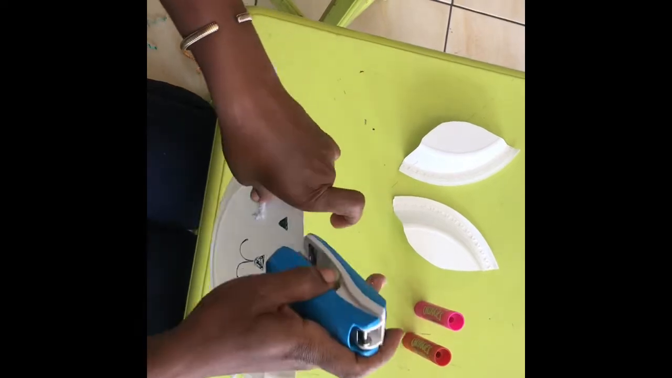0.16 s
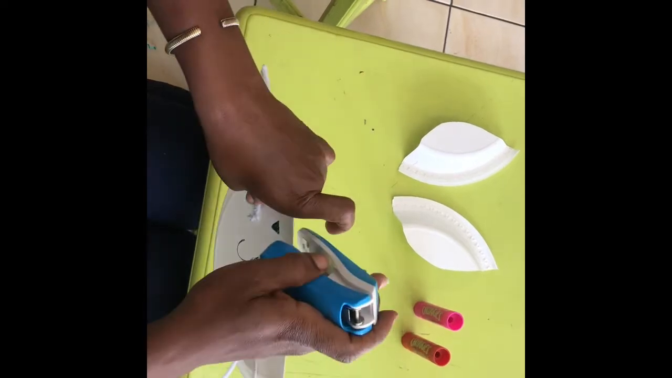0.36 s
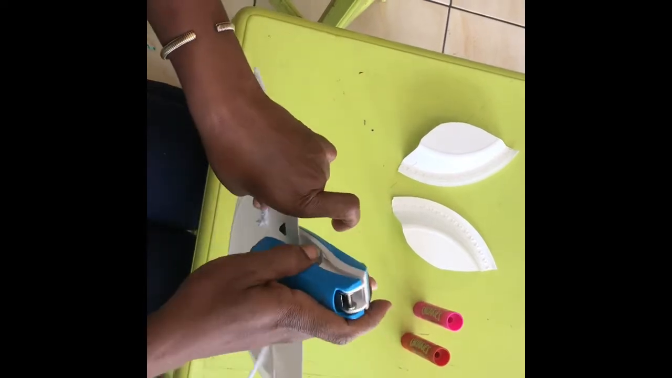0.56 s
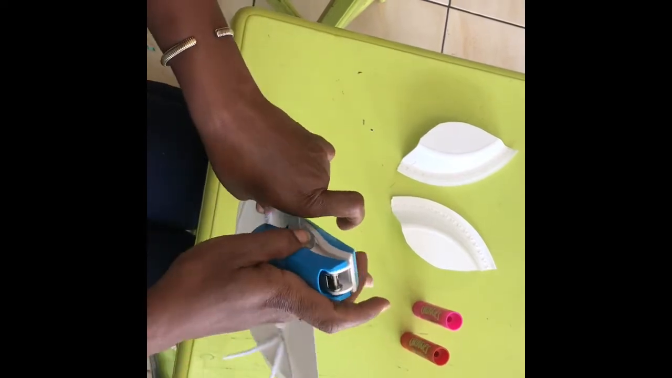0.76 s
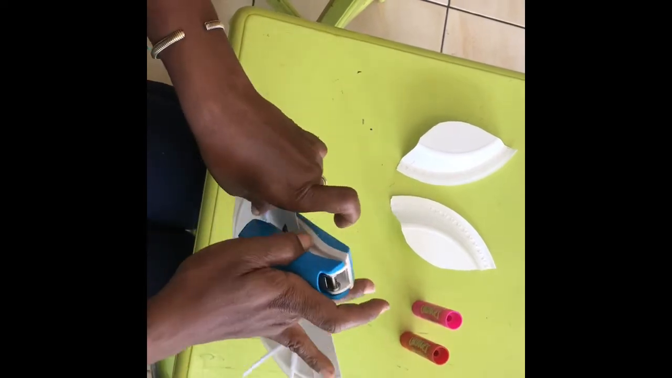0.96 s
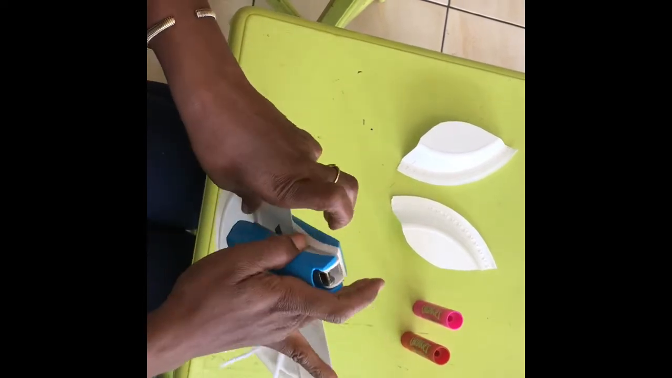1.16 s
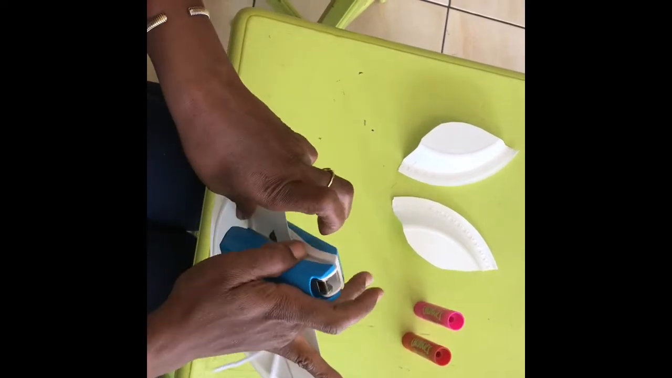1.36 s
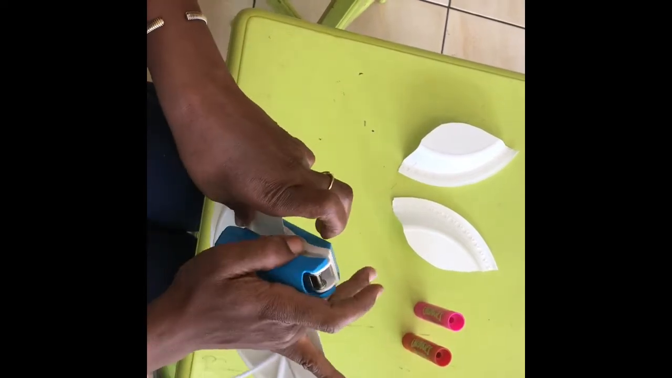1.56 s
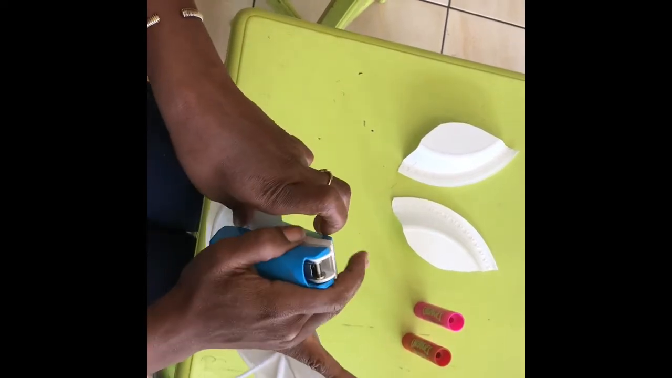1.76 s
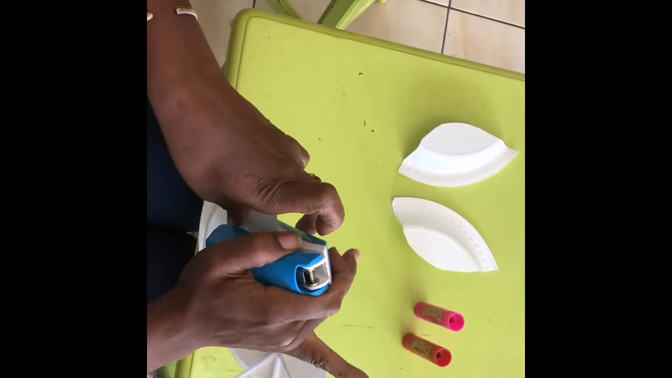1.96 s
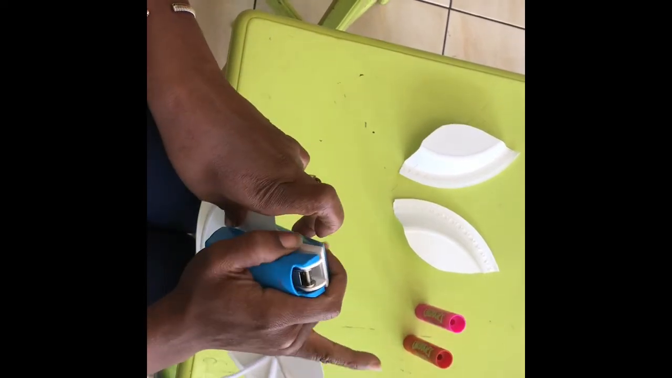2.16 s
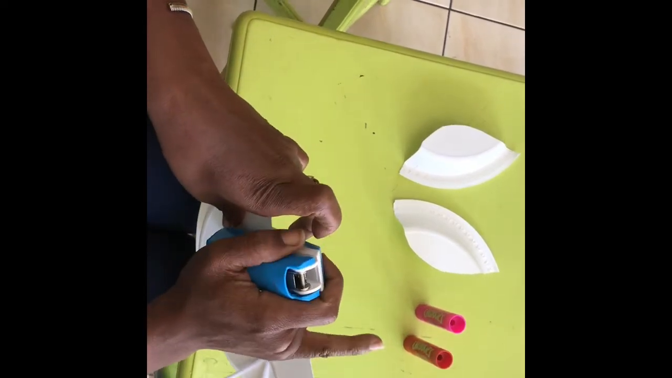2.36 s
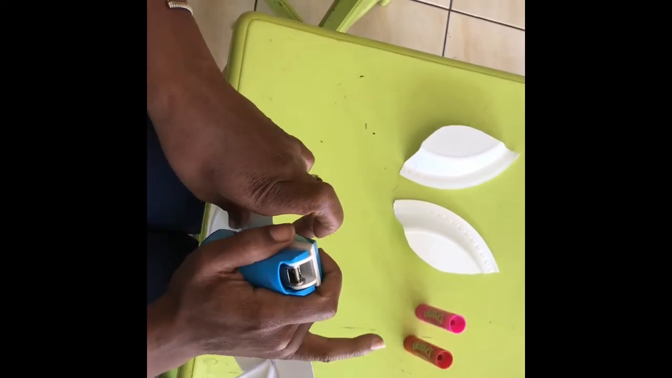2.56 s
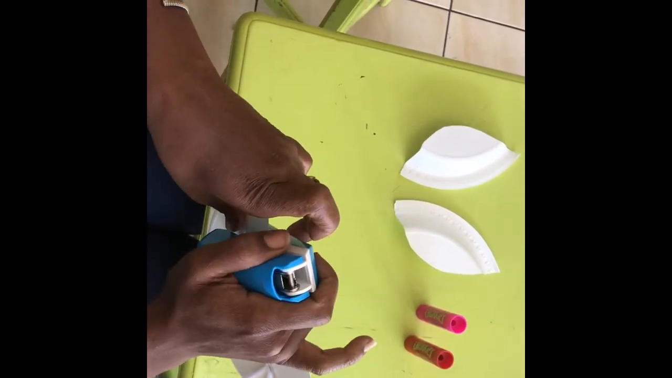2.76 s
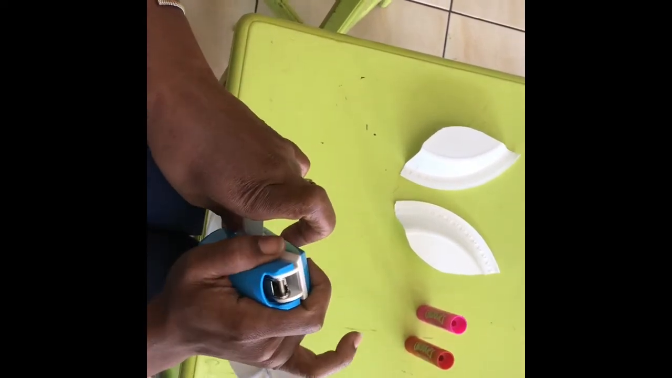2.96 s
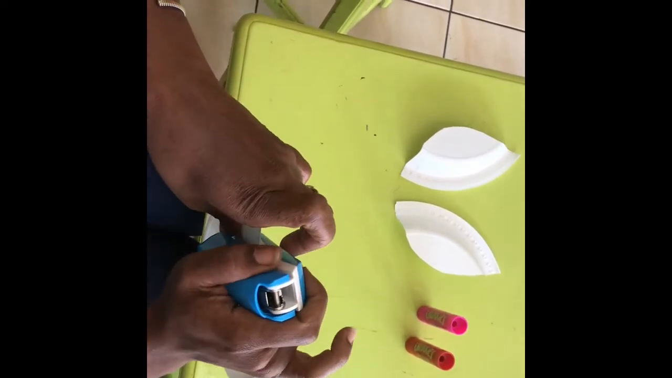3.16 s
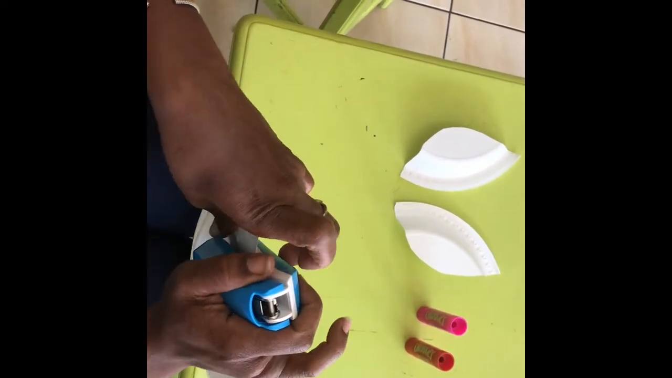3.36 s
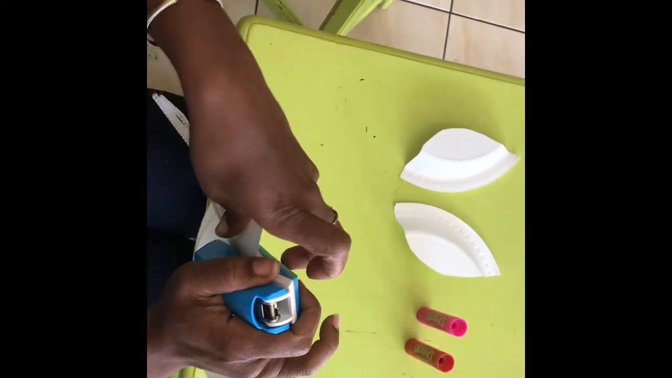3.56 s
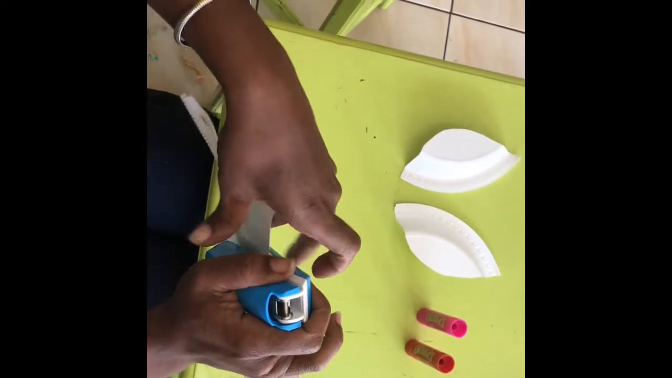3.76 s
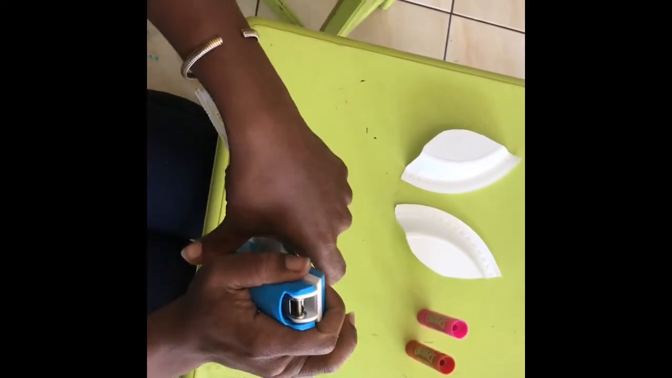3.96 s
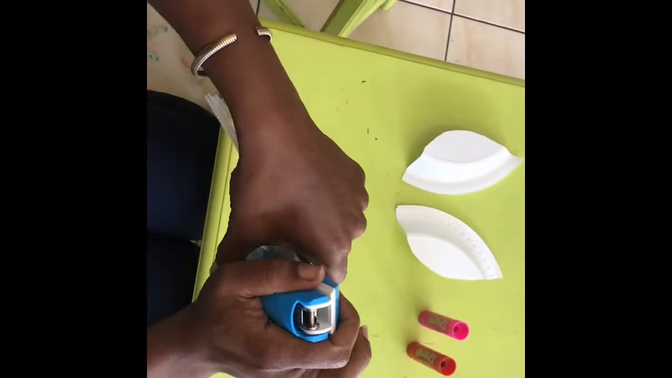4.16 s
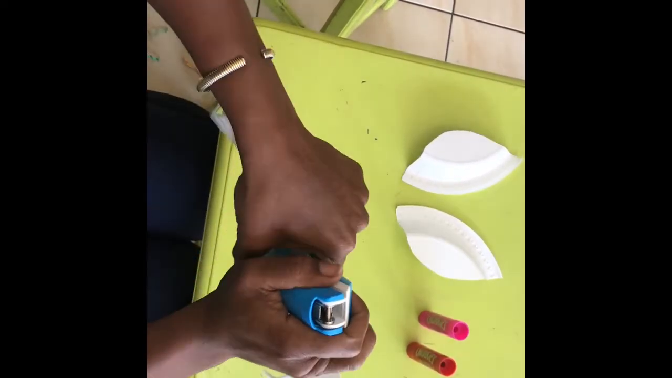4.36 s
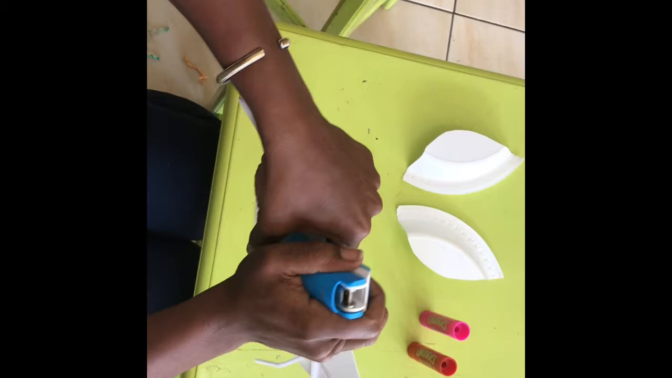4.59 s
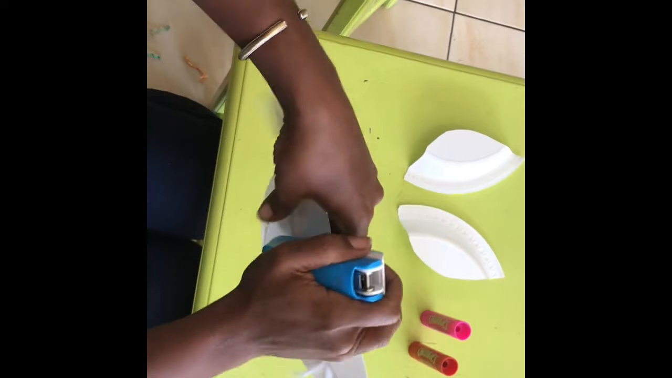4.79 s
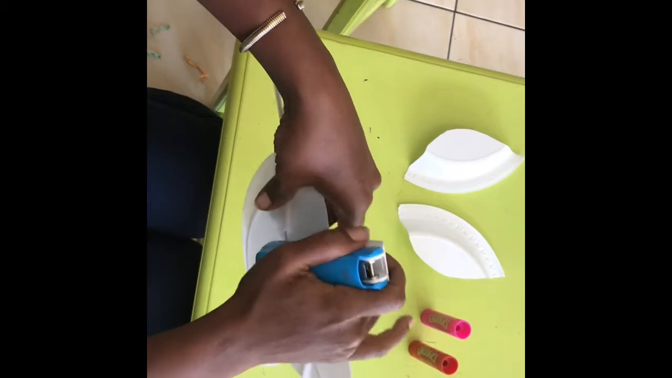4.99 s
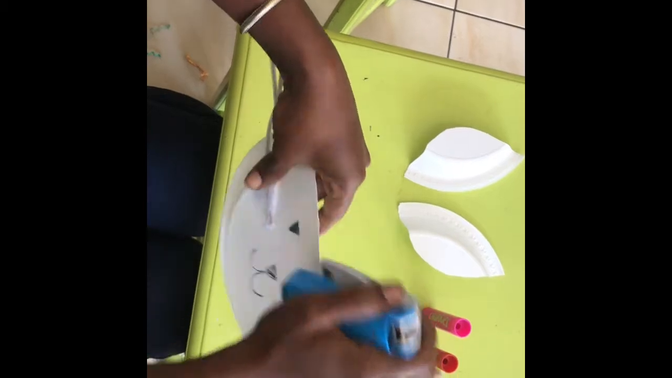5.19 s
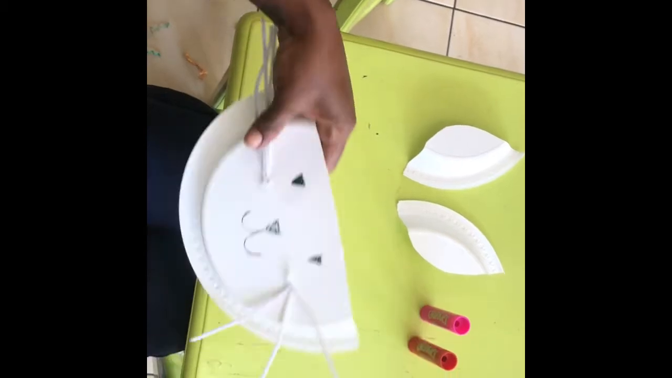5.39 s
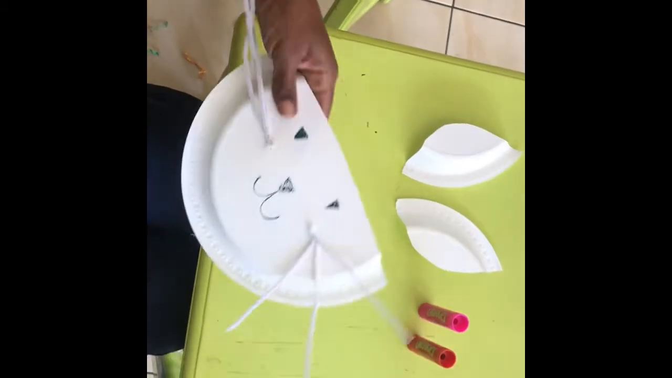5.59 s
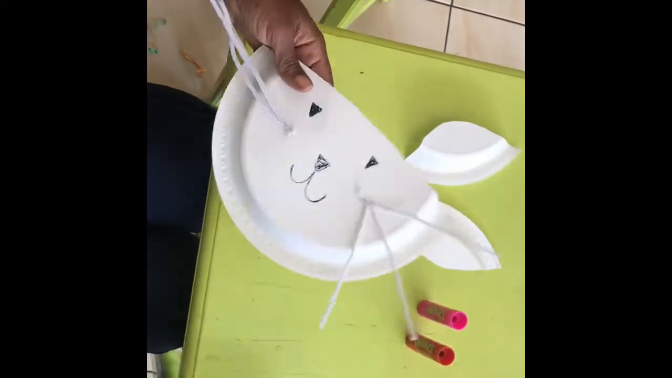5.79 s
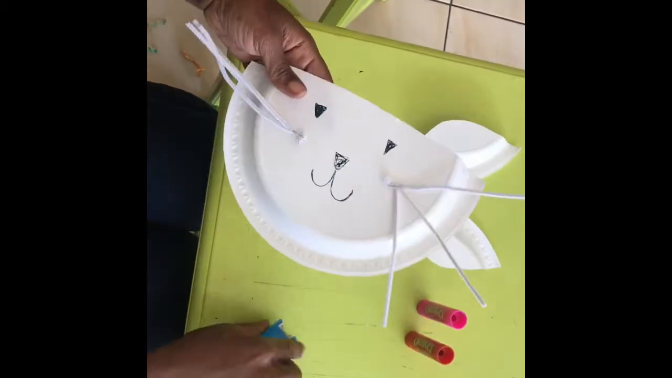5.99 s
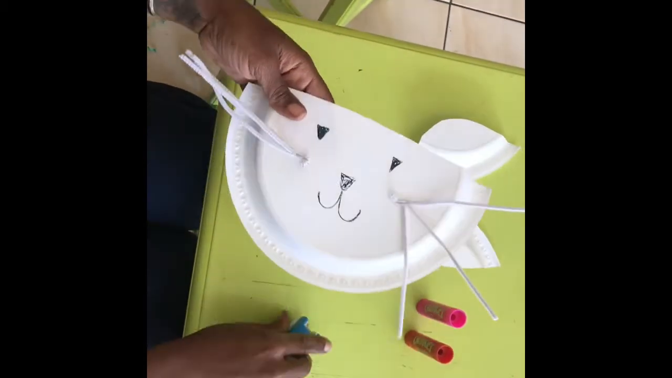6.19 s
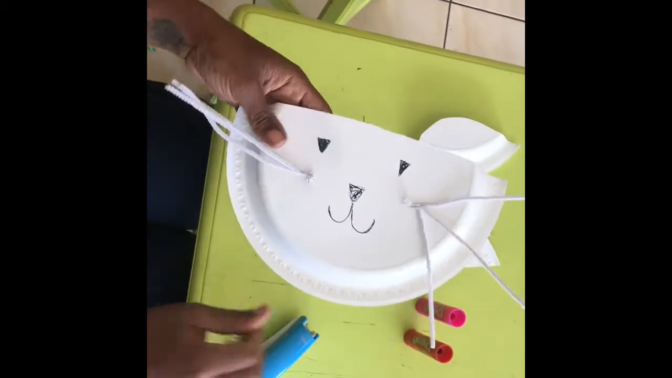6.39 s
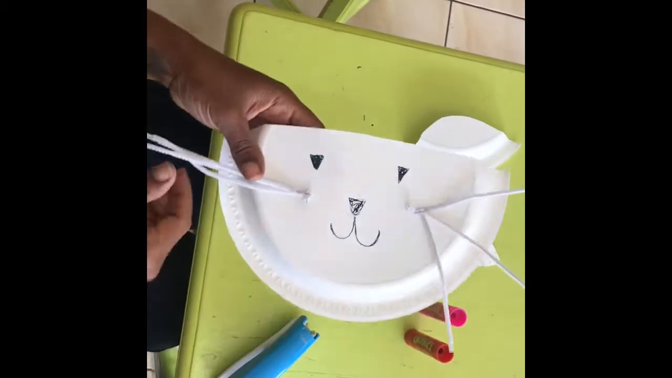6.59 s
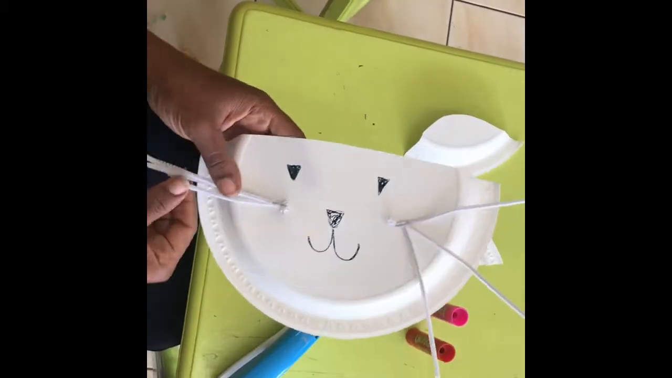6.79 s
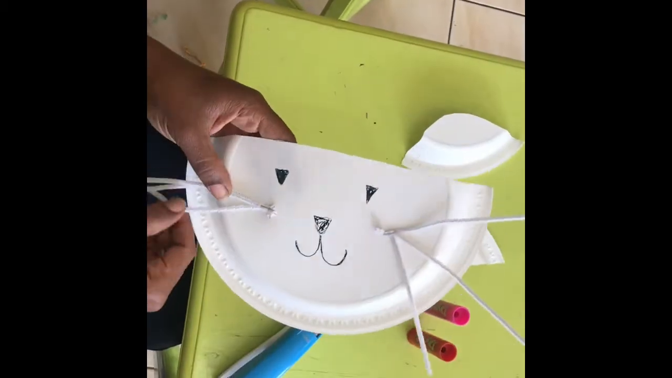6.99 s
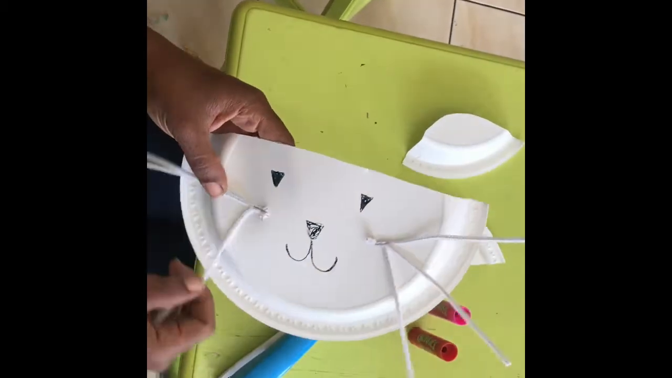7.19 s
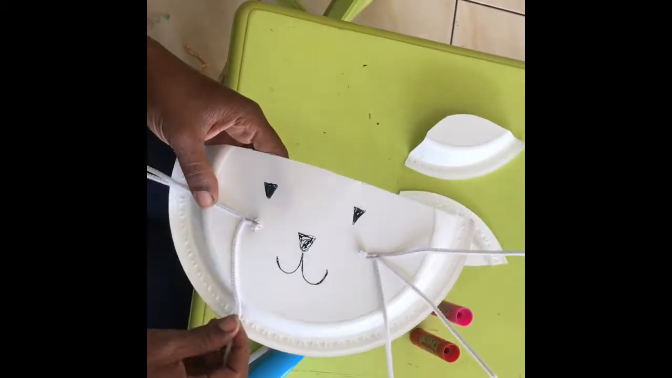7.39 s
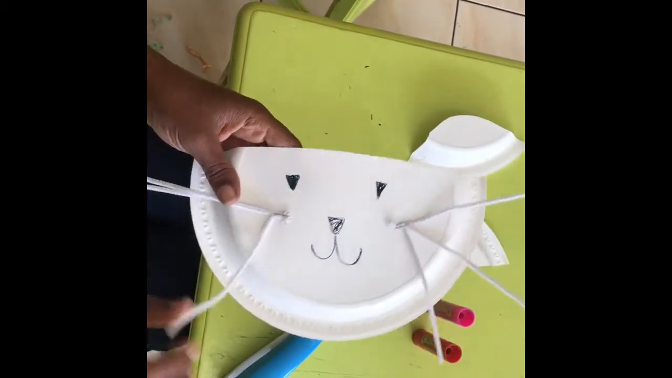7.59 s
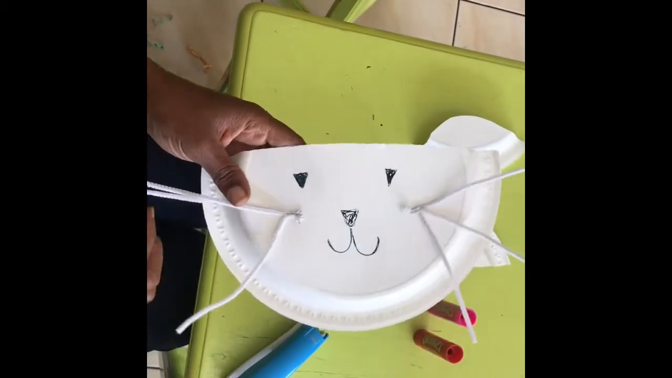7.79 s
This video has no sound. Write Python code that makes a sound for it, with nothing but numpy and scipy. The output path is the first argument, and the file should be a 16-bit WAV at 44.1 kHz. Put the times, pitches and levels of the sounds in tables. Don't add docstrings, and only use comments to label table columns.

```python
import sys
import numpy as np
from scipy import signal
from scipy.fft import rfft, irfft, next_fast_len
from scipy.io import wavfile
from scipy.ndimage import uniform_filter1d, map_coordinates

SR = 44100
rng = np.random.default_rng(int(sys.argv[2]) if len(sys.argv) > 2 else 0)


def natural_amplitude(level_db):
    exponent = np.asarray(level_db, float) / 20
    return 10 ** exponent


def bounce(signal):
    frames = np.transpose(np.atleast_2d(signal))
    limited = np.clip(frames, -1, 1)
    pcm = np.round(limited * 32767).astype(np.int16)
    wavfile.write(sys.argv[1], SR, pcm)


N = 345725
PATHS = 4

# pitch_hz, level_db (per Hz)
HISS_COLOUR = [(41, -37), (70, -7.5), (108, -6), (130, -14.5), (205, -12.5), (316, -20), (347, -24),
               (573, -21.5), (789, -39), (1280, -29), (1640, -40), (2210, -35), (3180, -38.5), (13400, -52),
               (16500, -57.5)]
# pitch_hz, level_db, width_hz
HUM = [(100.7, -55, .8), (200, -67, 3), (305, -72, 8), (585, -70, 40)]
# time_s, level_db
RUMBLE = [(0.0, -62), (0.59, -57.5), (0.96, -57), (1.3, -53), (1.53, -62), (1.66, -49), (1.79, -54.5),
          (2.23, -51), (2.64, -59), (3.16, -63), (3.62, -59.5), (4.13, -57), (4.3, -61), (5.13, -61.5),
          (5.5, -58), (6.31, -61), (6.8, -58.5), (7.84, -57)]

# peak_s, level_db, brightness_db,
# rise_s, fall_s (time to change by 20 dB)
STROKES = [(.3, -56, -10, .04, .13), (.778, -49, -11, .1, .13), (.225, -50, -12, .02, .1),
           (3.635, -49, -12, .02, .12), (3.86, -48, -8, .03, .2), (.83, -54, -11, .1, .1),
           (1.045, -57, -13, .12, .05), (.98, -59, -11, .2, .3), (1.24, -46, -14, .05, .1),
           (1.268, -49, -11, .04, .1), (2.222, -54, -11, .02, .13), (1.67, -67.5, -12, .3, .08),
           (1.976, -67.5, -13, .4, .3), (2.24, -63.5, -10, .06, .5), (2.854, -66, -10, .04, .12),
           (3.51, -63, -9, .3, .1), (3.615, -54.5, -6.5, .11, .08), (3.72, -58.5, -10, .05, .12),
           (4.67, -63, -12, .06, .12), (4.95, -65, -10, .07, .6), (5.096, -61, -5, .25, .17),
           (5.245, -50, -15, .12, .07), (5.36, -61, -11.5, .05, .2), (5.658, -62.5, -9, .7, .4),
           (5.86, -65, -8, .1, .2), (6.386, -68.5, -7, .03, 1.1), (6.966, -56, -9, .3, .08),
           (7.15, -66, -9, 1.1, .3), (7.3, -58.5, -9, .15, .45)]
# peak_s, level_db, brightness_db
FLICKS = [(.002, -60, -6), (.745, -55, -10), (.425, -58, -15), (.858, -49, -7.5), (.878, -53, -10),
          (.735, -56, -12), (2.284, -57, -12), (1.147, -57, -8), (1.74, -63, -3), (1.834, -55.5, -8.5),
          (2.566, -54, -14), (2.59, -56, -4), (3.0, -61, -12), (3.12, -67, -16), (3.176, -73, -5),
          (3.385, -67, -3), (3.785, -57, -20), (4.735, -54, -13), (4.878, -53, -13), (5.83, -64, -5),
          (6.622, -71.5, -10), (6.702, -67, -10), (7.42, -63, -10), (7.5, -62, -6.5), (7.56, -62, -12),
          (7.716, -66.5, -6.5), (7.77, -67, -15)]
# pitch_hz, level_db (per Hz)
SCUFF_COLOUR = [(410, -46), (700, -1.5), (1040, -14), (1170, -7), (1500, -5.5), (2330, 0), (3570, -8.5),
                (4690, -5.5), (5900, -4), (6410, -2), (8500, -26), (11000, -46), (18700, -120)]
# pitch_hz, level_db (per Hz)
FIZZ_COLOUR = [(4410, -39), (7500, -6.5), (10200, -5.5), (12500, -2.5), (14900, -3), (16300, -21),
               (16500, -52)]

# start_s, peak_db, plate_boom_db, bright_edge_db, ring_hz
CRACKS = [(0.2052, -16, -37, -22, 5960), (.002, -47, -30, -10, 6000), (0.274, -33, -14, -14, 2800),
          (.4622, -28, -35, -30, 12600), (2.101, -39.5, -25, -23, 6300), (3.7935, -21, -3, -45, 1900),
          (3.7965, -17, -4, -40, 1300), (3.7995, -21, -3, -38, 2200), (3.8025, -28, -6, -30, 1500),
          (3.8122, -22, -14, -4, 2930), (3.8254, -33, -6, -2, 2320), (3.829, -30, -6, -8, 2300),
          (3.836, -24, -12, 3, 2270), (3.8395, -23, -10, 6, 3000), (4.369, -43, -30, 10, 11500),
          (4.5664, -49, -30, 8, 9500), (4.80, -40, -20, -25, 3000), (4.878, -34, -10, -14, 1800),
          (5.207, -41, -25, -25, 6000), (5.219, -36, -25, -6, 4500), (5.2535, -31, -20, -14, 4300),
          (5.2595, -20, -16, -14, 5800), (5.2602, -24, -20, -30, 4300), (5.262, -31, -7, -20, 2500),
          (6.0435, -22, -8, -13, 1900), (6.0475, -38, -8, 5, 1500), (6.056, -27, -8, -16, 2800),
          (6.1782, -35, -11, -16, 3200)]
# start_s, peak_db, plate_boom_db, bright_edge_db, ring_hz
TICKS = [(0.2044, -23, -24, -8.5, 1900), (0.3035, -34, -17, -8, 5900), (.427, -37, -14, -12, 2400),
         (0.517, -39.5, -19, -25, 2040), (1.1462, -41, -10, 0, 5300), (1.1605, -38, -8, -19, 5650),
         (1.2304, -30, -14, -3.5, 6500), (2.2065, -44, -10, -6, 5800), (2.599, -25, -43, 2, 6600),
         (2.6968, -41, -14, -1, 6950), (3.6225, -20, -12, -8, 2400), (3.7901, -20, -1, -40, 2510),
         (4.8245, -24, -10, -14, 2400), (6.0207, -38.5, -18, -12, 2500)]
# start_s, peak_db, plate_boom_db, bright_edge_db, ring_hz
SLIDES = [(0.407, -38, -4, -13, 2000), (1.2175, -34, -4, -3, 4700), (2.1605, -46, -2, 0, 1500),
          (3.028, -51, 3, -15, 4260), (3.3929, -31.5, -5.5, -9, 2080), (3.6235, -33, -23, -25, 2400),
          (3.842, -26, -2, -14, 2100), (5.249, -39, -13, -10, 4200), (5.6319, -47, 1, -21, 1920),
          (5.640, -44, -10, -39, 598), (6.295, -47, -8, -39, 700), (7.120, -47.5, -1, -25, 894),
          (7.5115, -35, -12, -14, 2480), (7.513, -41, -20, -30, 1800)]
# start_s, peak_db, bright_edge_db, ring_hz
CREASES = [(0.961, -42.5, -3, 2300), (1.0571, -46, -24, 4700), (1.7365, -53, -7, 2690),
           (2.2848, -42.5, -21, 6000), (2.3604, -50, -11, 2540), (2.526, -46, -8, 6040),
           (2.5582, -47.5, 0, 2410), (2.848, -57, -14, 2470), (3.0004, -45, 1, 4400),
           (3.12, -47, -33, 2300), (3.1978, -54, -20, 2470), (3.7054, -42, -8, 2240),
           (3.738, -47, -8, 2300), (4.2605, -52, 3, 4000), (4.6337, -48, -1, 2590), (4.6575, -52, -6, 2120),
           (4.975, -46, -15, 2240), (5.1115, -48, -24, 2350), (5.1844, -46, -23, 5520),
           (5.3872, -51, -19, 1610), (5.7294, -49, -14, 1900), (7.7084, -57.5, -18, 2240)]

# start_s, peak_db, pitch_hz, t60_s (time to
# fade by 60 dB)
RINGS = [(.207, -32, 1900, .05), (.022, -66, 1660, .8), (.205, -20, 2740, .016),
         (.205, -23, 6050, .018), (.205, -31, 3350, .02), (.205, -30, 1520, .02),
         (.205, -30, 12400, .015), (.4615, -27, 12600, .014), (2.2115, -28, 2450, .014),
         (2.2115, -38, 1240, .022), (2.212, -40, 1810, .025), (2.212, -44, 813, .03),
         (2.599, -33, 5720, .02), (2.599, -32, 6580, .016), (2.599, -32, 4350, .014),
         (3.623, -27, 2400, .028), (3.623, -38, 1330, .025), (3.623, -35, 4330, .02),
         (3.623, -36, 3400, .02), (3.623, -35, 6310, .02), (3.794, -25, 1200, .035),
         (3.7985, -29, 2000, .02), (3.812, -30, 3000, .02), (3.836, -30, 2300, .025),
         (3.842, -32, 1170, .08), (3.848, -36, 1920, .06),
         (4.2845, -12, 3420, .02), (4.2855, -25, 1640, .02), (4.385, -27, 1100, .03),
              (4.2855, -16, 7530, .02), (4.2855, -20, 5990, .02), (4.285, -20, 5180, .025),
              (4.285, -21, 4180, .025), (4.294, -30, 6918, .07), (4.384, -16, 4040, .03),
              (4.3797, -16, 5600, .02), (4.3845, -19, 8120, .025), (4.384, -20, 6040, .02),
              (4.385, -24, 2350, .02), (4.776, -38, 7300, .045), (4.8075, -38, 7200, .02),
              (4.825, -26, 2450, .035), (4.8245, -25, 7100, .04), (4.8245, -26, 4090, .022),
              (4.8235, -27, 9380, .018), (4.905, -48, 5500, .08), (5.259, -22, 4660, .018),
              (5.259, -24, 5750, .016), (5.259, -25, 6730, .016), (5.261, -35, 2360, .035),
              (5.26, -36, 1100, .03), (5.248, -42, 2600, .04), (6.058, -42, 7000, .085),
              (6.0435, -29, 1500, .02), (6.079, -41, 13600, .04), (6.059, -46, 15000, .06),
              (6.196, -43, 11420, .05), (6.196, -45, 7200, .04)]
# start_s, length_s, pitch_hz, level_db
SQUEAKS = [(2.218, .09, 2250, -68), (.23, .04, 2700, -58), (.73, .07, 2300, -58), (.74, .055, 4700, -57),
           (.76, .04, 5500, -58), (.83, .05, 4700, -59), (1.205, .04, 4700, -52), (1.215, .06, 6500, -51),
           (.96, .09, 2300, -64), (4.83, .05, 2500, -52), (4.88, .08, 2500, -57), (5.615, .065, 600, -52),
           (6.36, .17, 2900, -70), (6.37, .2, 4600, -77), (6.9, .09, 1950, -61), (.23, .04, 2350, -57),
           (.79, .09, 6000, -59), (1.255, .035, 6300, -57)]
# start_s, peak_db
DRUMS = [(.275, -47), (.408, -47), (.428, -50), (.86, -52), (3.792, -36), (3.82, -40), (3.85, -40),
         (4.286, -32), (4.384, -31.5), (6.3, -47), (6.33, -52), (2.212, -50), (1.25, -52), (7.71, -53),
         (5.265, -49)]
# pitch_hz, level_db, t60_s
DRUM_TONES = [(252, -3, .15), (350, -3, .09), (505, -1, .13)]

# start_s, peak_db, bright_edge_db, chatter_t60_s, magazine_ring_db
SNAPS = [(0.466, -38, 0, 0.036, -27), (0.5128, -35.5, 3, 0.027, -28), (4.7405, -39, -3, 0.018, -30),
         (4.7675, -38, -8, 0.015, -27), (4.7758, -31, 2, 0.03, -21), (4.8074, -31, 3, 0.02, -11),
         (4.8108, -35, 5, .02, -12), (4.8232, -18, 0, .008, -39), (4.8248, -13, 2, 0.016, -39),
         (4.8345, -29, 2, .025, -18), (4.9047, -32, 0, 0.03, -16), (4.9085, -36, 0, .02, -8),
         (4.918, -35, 0, 0.018, -28), (5.8198, -37, -3, 0.019, -26), (6.0595, -36, 1, 0.05, -6),
         (6.0795, -34, 3, 0.03, -21), (6.086, -35, -4, .04, -21), (6.172, -49, 0, .02, -20),
         (6.1935, -38, 5, 0.05, -20), (6.206, -41, 3, .03, -16)]
# start_s, peak_db, plate_boom_db, chatter_t60_s, magazine_ring_db
BITES = [
    (4.2824, -23.5, -25, .012, -41),
    (4.2841, -1, -23, .009, -30.5),
    (4.2853, 0, -22, 0.0115, -30),
    (4.2877, -8.5, -13.5, 0.012, -28),
    (4.2906, -17, -13.5, 0.012, -14),
    (4.3800, -3, -17, 0.0092, -30.5),
    (4.3827, -10.5, -8.5, 0.0082, -27.5),
    (4.384, 0.8, -21.5, 0.0077, -28.5),
    (4.3864, -8, -13, .016, -32),
    (4.390, -14, -8, 0.016, -10.5),
]
# pitch_hz, level_db, t60_s
MAGAZINE = [(11420, 0, .1), (11455, -7, .07), (7000, -12, .045), (5500, -14, .06), (4030, -12, .06),
            (14000, -14, .04)]
# pitch_hz, width_hz, level_db
SHELL = [(1600, 540, -8), (2500, 1300, -5), (4200, 1000, 0.5), (5720, 760, 4), (7900, 1700, 4.5)]
# pitch_hz, width_hz, level_db
PLATE = [(265, 140, 1), (530, 50, 1), (1190, 920, -2.5)]

# start_s, peak_db
THUDS = [
    (6.023, -32),
    (6.045, -32),
    (6.057, -23.5),
    (6.182, -36.5),
    (6.201, -36),
    (6.301, -41),
    (6.356, -41),
]
# pitch_hz, width_hz, level_db
TABLE_TOP = [(159, 23, 1.5), (259, 27.5, -1.5), (420, 35, -12)]
# pitch_hz, t60_s
ROOM_FADE = [(150, 0.5), (500, 0.74), (2000, .45), (6000, 0.36), (14000, 0.39)]
# pitch_hz, gain_db
MICROPHONE = [(25, -7), (45, -1), (9300, 1.5), (10500, -1.5), (11600, 2), (15800, 2.5), (16050, -10.5),
              (16800, -30), (17100, -70)]


def unit(x):
    return x / np.sqrt(np.mean(x ** 2) + 1e-20)


def along(points, hz):
    f, value = np.transpose(points)
    return np.interp(np.log(hz + 1), np.log(f + 1), value)


def curves(rows):
    s, *columns = np.transpose(rows)
    return [np.interp(np.arange(N) / SR, s, column) for column in columns]


def wobble(rate):
    knots = rng.standard_normal(int(N * rate / SR) + 4)
    return map_coordinates(knots, [np.arange(N) * rate / SR])


def filtered(x, response):
    size = next_fast_len(len(x) + min(8192, len(x) // 4), True)
    spectrum = rfft(x, size) * response(np.fft.rfftfreq(size, 1 / SR))
    return irfft(spectrum, size)[:len(x)]


def resonances(modes):
    def response(f):
        return sum((-1) ** k * natural_amplitude(db) * 1j * f * width / (hz * hz - f * f + 1j * f * width)
                   for k, (hz, width, db) in enumerate(modes))
    return response


def noise(response):
    return unit(filtered(rng.standard_normal(N), response))


def add(track, s, sound):
    part = track[..., round(s * SR):][..., :sound.shape[-1]]
    part += sound[..., :part.shape[-1]]


def place(track, k, s, sound):
    add(track[0], s, sound[0])
    add(track[1 + k % PATHS], s, sound[1])


def background():
    hiss = natural_amplitude(-56 + 0.38 * wobble(1.4)) * noise(lambda f: natural_amplitude(along(HISS_COLOUR, f)))
    hum = sum(natural_amplitude(db) * noise(resonances([(hz, width, 0)])) for hz, db, width in HUM[1:])
    hz, db, drift_hz = HUM[0]
    phase = 2 * np.pi * np.cumsum(hz + drift_hz * wobble(4)) / SR
    hum += natural_amplitude(db + 2.5 + 0.49 * wobble(4.1)) * np.sin(phase)
    band = resonances([(49.36, 19, -4.5), (76, 10, -16.5)])
    narrow = resonances([(52, 45, 0)])
    rumble = natural_amplitude(curves(RUMBLE)[0] + 5.8) * noise(lambda f: band(f) * narrow(f))
    return hiss + hum + rumble


def rubbing():
    t = np.arange(0, N / SR, .002)
    flick_rise_s, flick_fall_s = .03, .065
    rest_db, rest_bright_db = -81, -5
    rows = STROKES + [(*row, flick_rise_s, flick_fall_s) for row in FLICKS]
    s, db, bright_db, rise, fall = np.transpose(rows)[..., None]
    stroke_db = db - 20 * np.maximum((s - t) / rise, (t - s) / fall)
    level_db = np.maximum(rest_db, stroke_db.max(0))
    fizz_db = np.maximum(rest_db + rest_bright_db, (stroke_db + bright_db).max(0))
    level_db, fizz_db = curves(np.transpose([t, level_db, fizz_db]))
    grains = rng.standard_normal(N) * natural_amplitude(2.4 * wobble(600) + 1 * wobble(70))
    scuff = unit(filtered(grains, lambda f: natural_amplitude(along(SCUFF_COLOUR, f))))
    fizz = unit(filtered(grains, lambda f: natural_amplitude(along(FIZZ_COLOUR, f))))
    return natural_amplitude(level_db) * scuff + natural_amplitude(fizz_db + 2.5) * fizz


def contact(db, boom_db, edge_db, t60, shell, spike=0.):
    t = np.arange(SR // 14) / SR
    envelope = natural_amplitude(-60 * t / t60) * (1 - np.exp(-t / (0.03 * t60)))
    grip = natural_amplitude(.4 * rng.standard_normal())

    def dull(f, hz):
        return 1 / (1 + 1j * f / hz) ** 2

    def body(f):
        return resonances(shell)(f * grip) * dull(f, 7000)

    def boom(f):
        return resonances(PLATE)(f * grip) * dull(f, 2500) * (1 - dull(f, 280))

    def edge(f):
        modes = [(8600, 2200, -3), (12600, 2500, 0), (14800, 2500, -1.5)]
        return resonances(modes)(f * grip) * (1 - dull(f, 11000))

    def blur(part):
        return lambda f: np.sqrt(sum(abs(part(f * k)) ** 2 for k in (.85, 1, 1.18)))

    out = np.zeros((2, len(t)))
    for part, part_db in (body, 0), (boom, boom_db), (edge, edge_db):
        roughness = natural_amplitude(4.25 * rng.standard_normal(len(t)))
        force = envelope * rng.standard_normal(len(t)) * roughness
        lead = spike * np.linalg.norm(force) * (t == t[22])
        chatter = filtered(force - lead, part)
        blow = filtered(1. * (t == t[200]), blur(part))
        blow *= np.linalg.norm(chatter) / np.linalg.norm(blow)
        out += natural_amplitude(db + part_db - 2.0) * np.array([chatter, blow]) / np.abs(chatter).max()
    return out


def ticks():
    out, t = np.zeros((1 + PATHS, N)), np.arange(SR // 6) / SR
    kinds = (CRACKS, .014), (TICKS, .031), (SLIDES, .058)
    rows = [(*row, t60) for kind, t60 in kinds for row in kind]
    rows += [(s, db, -56 - db, edge_db, hz, .027) for s, db, edge_db, hz in CREASES]
    for k, (s, db, boom_db, edge_db, hz, t60) in enumerate(sorted(rows)):
        patch = [(hz, 0.23 * hz, 0), (5000, 4000, .45 * edge_db - 5.0)]
        place(out, k, s - .0012, contact(db, boom_db, edge_db, t60, patch))
        fade = natural_amplitude(db - 18 - 60 * t / (2.0 * t60))
        add(out[0], s, fade * np.sin(2 * np.pi * hz * t) * (1 - np.exp(-t / .002)))
    return out


def rings():
    out, t = np.zeros((2, N)), np.arange(SR // 6) / SR
    for s, db, hz, t60 in RINGS:
        life = t60 * np.array([[1], [.4]])
        fade = natural_amplitude(db - 60 * t / life) * np.sqrt(t60 / life)
        add(out, s, fade * np.sin(2 * np.pi * hz * t) * (1 - np.exp(-t / .0006)))
    return out


def squeaks():
    out = np.zeros(N)
    for s, length, hz, db in SQUEAKS:
        band = resonances([(hz, .05 * hz, 0)])
        rub = filtered(rng.standard_normal(SR // 4), lambda f: band(f) ** 2)
        rub = rub[-round(length * SR):]
        add(out, s, natural_amplitude(db) * unit(rub) * np.sqrt(np.hanning(len(rub))))
    return out


def drum():
    out, t = np.zeros(N), np.arange(SR // 4) / SR
    ring = sum(natural_amplitude(db - 60 * t / t60) * np.sin(2 * np.pi * hz * t) for hz, db, t60 in DRUM_TONES)
    ring *= 1 - np.exp(-t / .0015)
    for s, db in DRUMS:
        add(out, s, natural_amplitude(db) * ring)
    return out


def stapler():
    out, t = np.zeros((1 + PATHS, N)), np.arange(SR // 4) / SR
    snap_boom_db = -14
    blows = [(s, db, snap_boom_db, edge_db, t60, ring_db) for s, db, edge_db, t60, ring_db in SNAPS]
    blows += [(s, db, boom_db, -7.5 - .55 * db, t60, ring_db) for s, db, boom_db, t60, ring_db in BITES]
    for k, (s, db, boom_db, edge_db, t60, ring_db) in enumerate(blows):
        spike = .9 * (db > -16)
        place(out, k, s - .0005, contact(db, boom_db, edge_db, t60, SHELL, spike))
        ring = sum(natural_amplitude(tone_db + 2 * rng.normal() - 60 * t / life) * np.sin(2 * np.pi * hz * t)
                   for hz, tone_db, life in MAGAZINE)
        ring *= 1 - np.exp(-t / 0.00067)
        place(out, k, s, natural_amplitude(db + ring_db + np.array([[0], [-5]])) * ring)
    return out


def table():
    pushes = np.zeros(N)
    for s, db in THUDS:
        add(pushes, s - .002, natural_amplitude(db + 14) * np.hanning(round(0.0021 * SR)))
    return filtered(pushes, resonances(TABLE_TOP))


def room(paths):
    out = np.zeros(N + SR)
    for x in paths:
        for at in range(0, N, SR):
            hz, t, z = signal.stft(rng.standard_normal(SR // 2), SR, nperseg=256)
            patches = uniform_filter1d(rng.standard_normal(z.shape), size=3, axis=0)
            patches = unit(uniform_filter1d(patches, size=5, axis=1))
            fade_db = 2.5 * patches - 60 * t / along(ROOM_FADE, hz)[:, None]
            tail = signal.istft(z * natural_amplitude(fade_db), SR, nperseg=256)[1]
            tail /= np.linalg.norm(tail)
            add(out, at / SR + .002, signal.fftconvolve(x[at:at + SR], tail))
    return out[:N]


def scene():
    sound = stapler() + ticks()
    sound[:2] += natural_amplitude([[0], [-7]]) * table() + natural_amplitude([[0], [-4]]) * drum() + rings()
    add(sound[0], .021, natural_amplitude(-24) * sound[0])
    warm = filtered(room(sound[1:]), lambda f: 1 / (1 + 1j * f / 4600))
    return (sound[0] + natural_amplitude(-6.5) * warm + rubbing() + background() + squeaks())[None]


def low_pass(x):
    return signal.sosfilt(signal.butter(12, 17020, fs=SR, output="sos"), x)


def record(dry):
    x = dry[0] / (1 + np.abs(dry[0] / .92) ** 8) ** (1 / 8)
    mix = filtered(x, lambda f: natural_amplitude(along(MICROPHONE, f)))[None]
    return low_pass(mix)


dry = scene()
out = record(dry)
bounce(out)
```